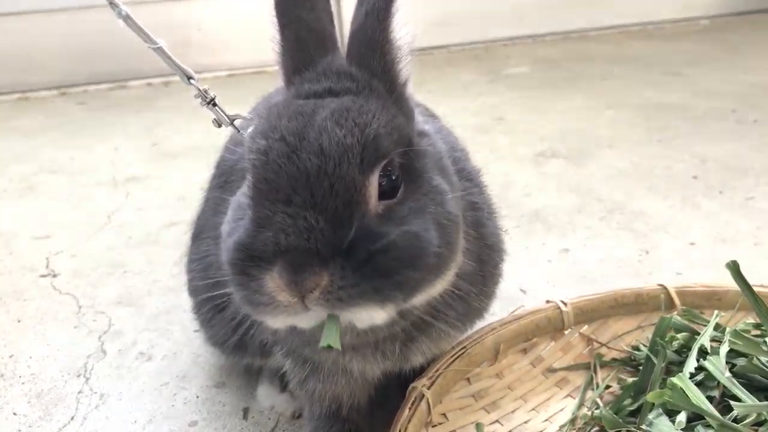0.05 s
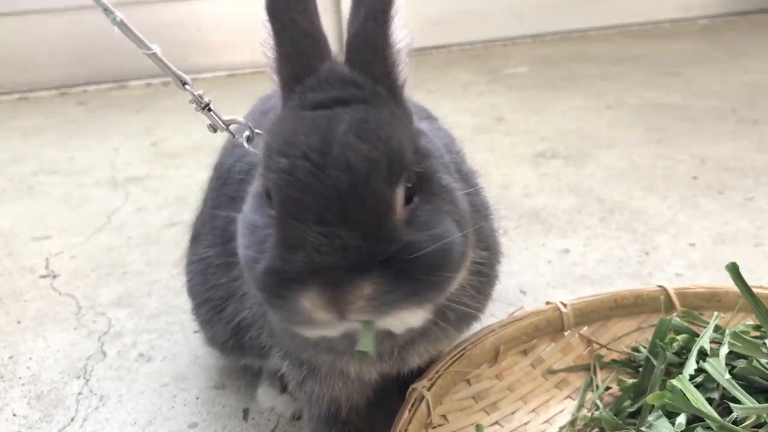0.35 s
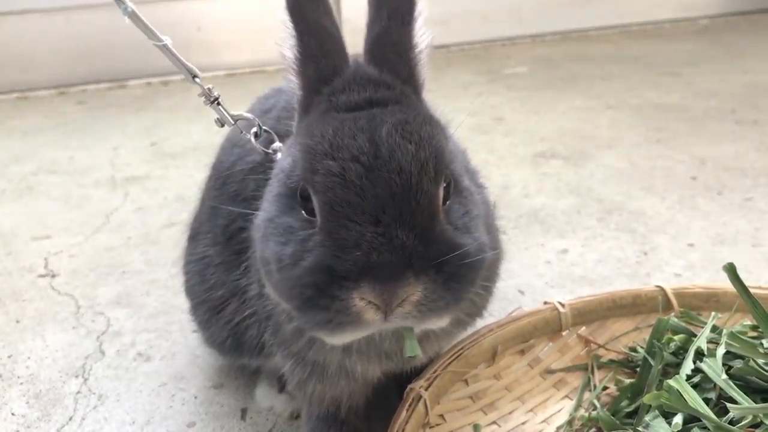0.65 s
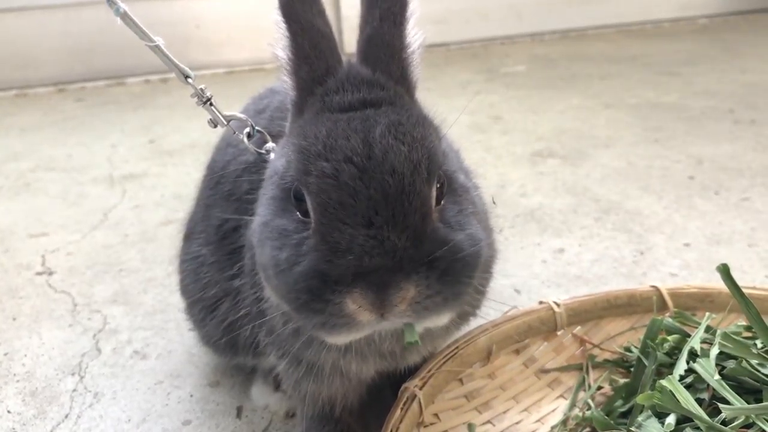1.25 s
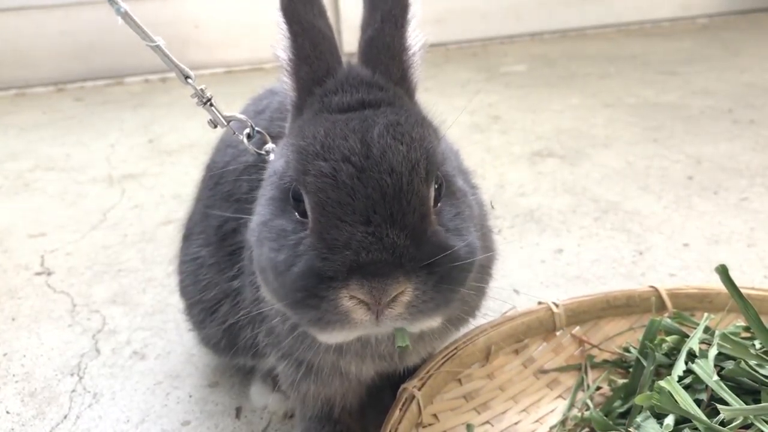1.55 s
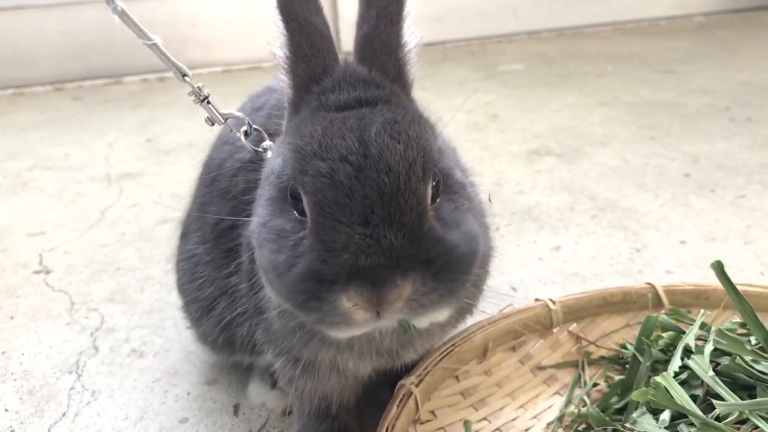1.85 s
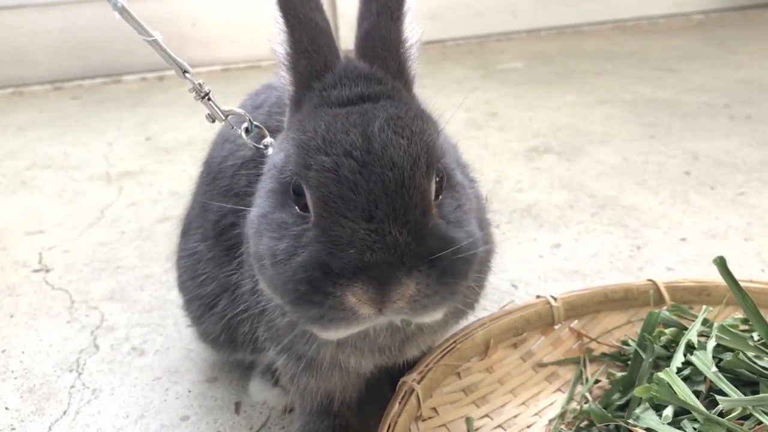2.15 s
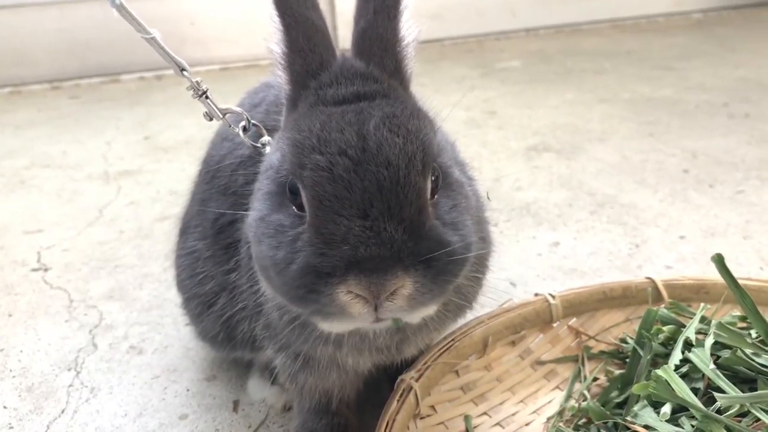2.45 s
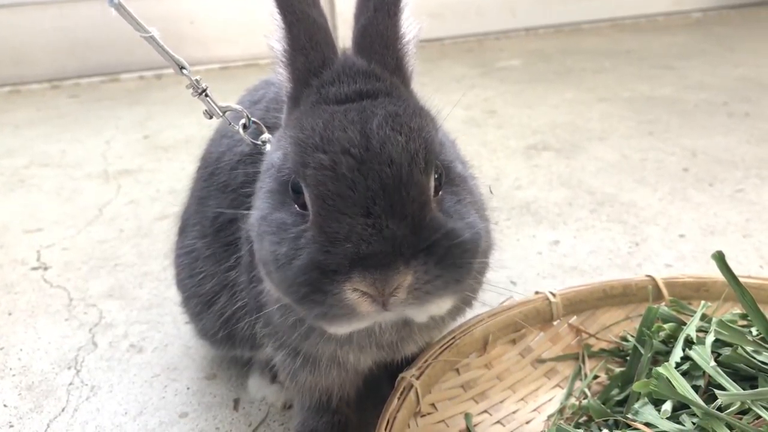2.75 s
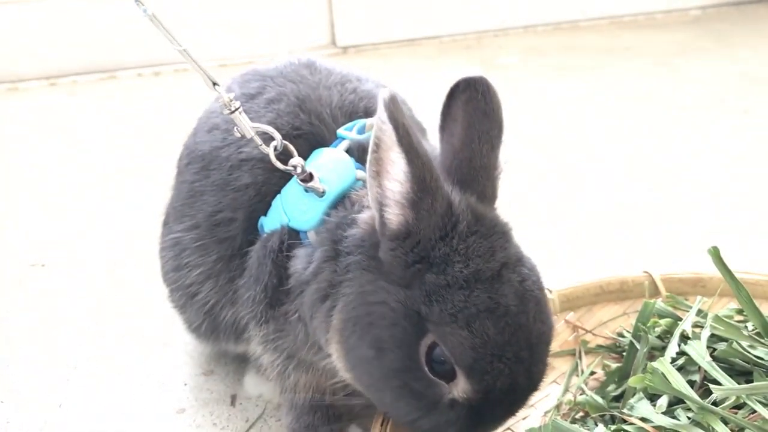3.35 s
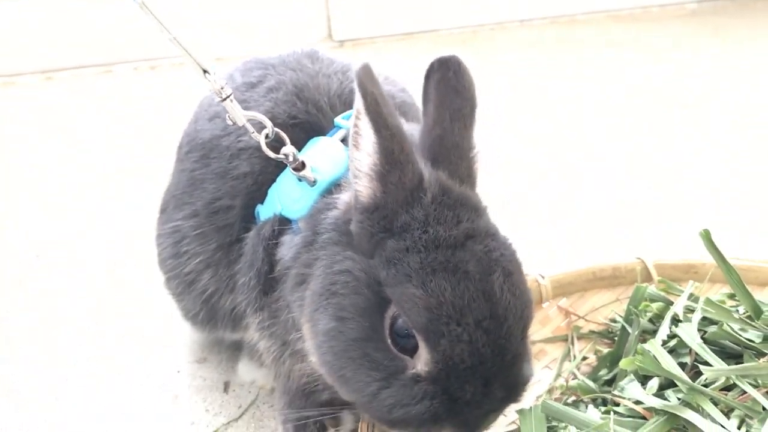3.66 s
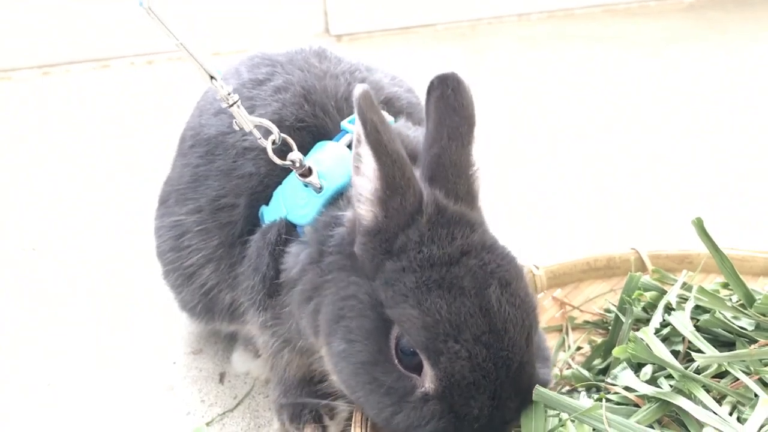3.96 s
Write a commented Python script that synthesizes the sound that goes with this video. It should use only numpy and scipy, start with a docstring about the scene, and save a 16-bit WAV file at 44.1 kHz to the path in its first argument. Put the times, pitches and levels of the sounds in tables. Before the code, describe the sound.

Close, regular crunching of a rabbit eating hay, then light leaf rustling.

```python
"""A rabbit chews hay close by, in a quiet room with a low machine hum and faint hiss.
From the start fibres grind and snap, and the teeth meet four to five times a second; the hard floor
echoes every click at once. From 0.5 s the mouth pops softly between knocks; at 2.5 s, a tiny squeak.
From 2.7 s the head dips into a basket: leaves rustle and the floor echo comes sooner."""
import sys
import numpy as np
from scipy import signal
from scipy.fft import rfft, irfft
from scipy.io import wavfile
from scipy.ndimage import map_coordinates

SR = 44100
rng = np.random.default_rng(int(sys.argv[2]) if len(sys.argv) > 2 else 0)


def log_audio(samples):
    """Write samples as a 16-bit WAV file to the path given in sys.argv[1]."""
    # one column per channel
    frames = np.atleast_2d(samples).T
    # limit to full scale, then quantise
    limited = np.clip(frames, -1, 1)
    pcm = np.round(limited * 32767).astype(np.int16)
    wavfile.write(sys.argv[1], SR, pcm)


N = 176400


def amp(db):
    """Decibels to gain."""
    return 10 ** (np.asarray(db) / 20)


def unit(x):
    """Scale to rms 1."""
    return x / np.sqrt(np.mean(x ** 2) + 1e-20)


def spectrum_db(colour, hz):
    """Interpolate (frequency [Hz], level [dB]) points on a log-frequency axis."""
    points_hz, db = np.transpose(colour)
    return np.interp(np.log(hz + 1), np.log(points_hz + 1), db)


def add(mix, start_s, sound):
    """Mix a sound in at start_s."""
    part = mix[max(0, round(start_s * SR)):][:len(sound)]
    part += sound[:len(part)]


def shaped_noise(gain):
    """Noise with the given gain per frequency bin, rms 1."""
    return unit(irfft(rfft(rng.standard_normal(N)) * gain, N))


def drift(hz):
    """Slow random wander, rms 1."""
    return shaped_noise(np.exp(-(np.fft.rfftfreq(N, 1 / SR) / hz) ** 2))


def click(*colours, size=1024):
    """Minimum-phase impulse with the sum of the given dB spectra."""
    hz = abs(np.fft.fftfreq(size, 1 / SR))
    log_gain = np.log(amp(sum(spectrum_db(colour, hz) for colour in colours)))
    spectrum = np.exp(np.conj(signal.hilbert(log_gain)))
    return np.fft.ifft(spectrum).real[:size // 2]


def crumble(sound, share, decay_s):
    """Spread a share of a click's energy into a dying spray of tiny fractures, thin in the bass."""
    t = np.arange(SR // 50) / SR
    spray = rng.standard_normal(len(t)) * np.exp(-t / decay_s)
    spray[0] = 0
    spray = signal.sosfilt(signal.butter(2, 1500, "highpass", fs=SR, output="sos"), spray)
    spray *= np.sqrt(share) / np.linalg.norm(spray)
    spray[0] = np.sqrt(1 - share)  # direct click
    return signal.fftconvolve(sound, spray)


def crackle(colour, per_s, spread_db):
    """Random tiny fractures of uneven size, rms 1; each stalk thickness stresses its own band."""
    stalks_hz, lift_db, relative_width = np.geomspace(1500, 13500, 10), 14, 0.2
    sizes = amp(spread_db * np.minimum(rng.exponential(1, N), 3)) * rng.choice([-1, 1], N)
    fractures = sizes * (rng.random(N) < per_s / SR)
    kind = rng.integers(0, len(stalks_hz), N)
    hz = np.fft.rfftfreq(1024, 1 / SR)
    out = np.zeros(N)
    for k, stalk_hz in enumerate(stalks_hz):
        band_db = lift_db / (1 + ((hz / stalk_hz - 1) / relative_width) ** 2)
        grain = click(colour, np.column_stack([hz, band_db]))
        out += signal.oaconvolve(fractures * (kind == k), grain)[:N]
    return unit(out)


def hum():
    """Low, nearly pure machine hum, slowly sagging in pitch, with two weak wavering lines."""
    # main line: (time [s], level [dB])
    envelope = [(0.0, -50.5), (0.81, -50.5), (1.1, -47.5), (2.03, -49), (2.17, -50), (2.71, -49.5),
                (3.39, -55.5), (4.0, -54)]
    # weak lines: (frequency [Hz], level re main line [dB])
    lines = [(176.5, -28.5), (205.4, -36)]
    start_hz, sag_hz_per_s = 103.7, 0.45
    def tone(hz, db):
        return np.sqrt(2) * amp(db) * np.sin(2 * np.pi * np.cumsum(hz) / SR)
    t = np.arange(N) / SR
    level_db = np.interp(t, *np.transpose(envelope))
    out = tone(start_hz - sag_hz_per_s * t + 0.13 * drift(hz=6.2), level_db + 0.25 * drift(hz=8.3))
    for hz, db in lines:
        out += tone(hz + 1.4 * drift(hz=4.4), level_db + db + 2 * drift(hz=4.7))
    return out


def room_tone():
    """Steady room noise with a thin high hiss and three soft low thuds."""
    # room noise: (frequency [Hz], relative density [dB])
    air_colour = [(22, -20), (42, 7.5), (62, 2), (90, 6), (140, -3.5), (250, -7), (500, -13.5),
                  (1000, -17.5), (2000, -23), (3300, -23.5), (4800, -25), (5400, -21), (6000, -26),
                  (7500, -28), (10000, -30.5), (12200, -23.5), (13400, -21.5), (15000, -19), (15800, -21.5),
                  (16000, -98)]
    # thuds: (centre [s], half-width [s], level [dB])
    thuds = [(1.21, 0.03, -57), (3.694, .08, -63), (3.89, 0.081, -65)]
    # thud spectrum: (frequency [Hz], relative density [dB])
    thud_colour = [(22, -21), (40, 7), (60, -4), (100, -4), (200, -69), (800, -65)]
    air_db, hiss_db, hiss_hz, half_width_hz = -66, -76, 13880, 300
    hz, t = np.fft.rfftfreq(N, 1 / SR), np.arange(N) / SR
    hiss = amp(hiss_db) * shaped_noise(1 / (1 + ((hz - hiss_hz) / half_width_hz) ** 2))
    air = amp(air_db) * shaped_noise(amp(spectrum_db(air_colour, hz)))
    thud_gain = sum(amp(db) * np.exp(-((t - at_s) / half_s) ** 2) for at_s, half_s, db in thuds)
    return air + hiss + thud_gain * shaped_noise(amp(spectrum_db(thud_colour, hz)))


def grinding():
    """Hay crackles faintly throughout and swells under each stroke of the jaw."""
    # jaw strokes: (centre [s], length [s], level before lift_db [dB])
    strokes = [(0.078, 0.12, -79), (0.392, 0.041, -79), (0.478, 0.019, -76), (0.565, 0.037, -75),
               (0.705, 0.033, -75), (1.061, 0.012, -70), (1.122, 0.075, -78.5), (1.267, 0.029, -75.5),
               (1.335, 0.022, -80.5), (1.546, 0.091, -81), (1.68, 0.013, -75), (1.751, 0.056, -79),
               (1.908, 0.02, -72.5), (1.986, 0.013, -76), (2.134, 0.014, -75.5), (2.201, 0.019, -79.5),
               (2.335, 0.029, -80.5), (2.434, 0.015, -78.5), (2.623, 0.068, -82), (2.712, 0.016, -71),
               (2.868, 0.03, -77.5), (2.933, 0.009, -77), (3.001, 0.0078, -71.5), (3.064, 0.013, -76.5),
               (3.276, 0.031, -78), (3.343, 0.015, -74.5), (3.675, 0.051, -77), (3.882, 0.044, -75.5),
               (3.972, 0.049, -80)]
    # hay fracture spectrum: (frequency [Hz], gain [dB])
    hay_colour = [(200, -28), (900, -1.5), (3000, -2), (4600, -8.5), (7000, -5.5), (9000, -4.5),
                  (11000, -0.5), (13200, 3), (16000, -21)]
    idle_db, lift_db = -79.5, 11
    t = np.arange(N) / SR
    power = np.full(N, amp(idle_db) ** 2)
    for at_s, length_s, db in strokes:
        power += amp(db + lift_db) ** 2 * np.exp(-(2 * (t - at_s) / length_s) ** 2)
    return np.sqrt(power) * crackle(hay_colour, per_s=1400, spread_db=9)


def snaps():
    """Single brittle fibres break with short bright ticks."""
    # breaks: (time [s], gain [dB], extra at 10 kHz [dB], extra up to 6.5 kHz [dB])
    breaks = [(0.0557, -25.0, 6.5, -9.5), (0.0631, -35.0, 1.0, 1.5), (0.0954, -21.0, -4.5, -18.0),
              (0.1833, -33.0, 5.0, -1.5), (0.4509, -30.0, 1.5, -9.0), (0.4791, -31.0, -2.5, -9.5),
              (0.4898, -25.5, -4.5, -24.5), (0.6291, -22.0, 10.0, -6.0), (0.666, -19.0, -1.5, -24.0),
              (0.7062, -27.5, -5.5, -12.0), (0.9055, -19.5, 0.5, -14.5), (0.9197, -18.5, -6.5, -12.0),
              (0.9991, -23.5, -6.5, -27.0), (1.0401, -34.0, 11.0, -6.0), (1.0686, -25.5, -3.5, -13.5),
              (1.1227, -28.5, 1.0, -16.5), (1.1362, -24.0, -3.5, -5.0), (1.3109, -18.0, -10.0, -18.5),
              (1.3564, -29.5, -11.5, -10.5), (1.3987, -29.0, 0.5, -11.5), (1.6029, -26.0, 3.5, 3.0),
              (1.7138, -30.0, -8.0, -3.0), (1.7469, -28.0, -8.0, -14.0), (1.9531, -16.0, -9.0, -17.0),
              (2.0184, -31.0, 5.0, -6.5), (2.1716, -28.5, 0.5, -22.5), (2.3472, -30.5, 5.5, -2.5),
              (2.3896, -26.0, -14.0, -7.0), (2.4413, -22.5, 0.0, -20.0), (2.4719, -28.5, -7.0, -22.0),
              (2.6519, -26.0, 9.5, -5.0), (2.812, -30.0, -11.0, -33.0), (3.0284, -31.5, 1.5, -5.0),
              (3.1925, -36.0, 10.0, -6.0), (3.2874, -37.0, 10.0, 5.5), (3.3157, -28.5, 11.0, -3.0),
              (3.4553, -24.5, 11.0, -4.0), (3.4879, -38.0, 11.0, 0.5), (3.5111, -26.5, 11.0, -1.5),
              (3.5196, -22.0, 11.0, -9.0), (3.5755, -33.5, 9.5, -0.5), (3.6915, -27.5, 3.0, -9.0),
              (3.6982, -30.5, 7.5, -10.5), (3.7131, -17.0, 9.0, -6.0), (3.8428, -23.5, 9.0, -19.0)]
    # tick spectrum: (frequency [Hz], gain [dB])
    fibre_colour = [(200, -24), (1500, -9), (3000, -5.5), (4200, -11), (6500, -5.5), (10000, -9.5),
                    (13300, -1.5), (16500, -5)]
    out = np.zeros(N)
    for at_s, db, mid_db, low_db in breaks:
        tick = click(fibre_colour, [(6500, low_db), (9200, mid_db), (11000, mid_db), (13300, 0)])
        add(out, at_s, amp(db) * crumble(tick, share=0.25, decay_s=0.0008))
    return out


def teeth():
    """Teeth knock once a chew, sometimes twice, coloured by the mouth's resonance."""
    # knocks: (time [s], gain [dB], extra at 2 kHz [dB], at 3.4 kHz [dB], at 6.5 kHz [dB], mouth [Hz])
    knocks = [(0.095, -27, 6, -6.0, -3.5, 604), (0.451, -23.5, -1.5, -13, -10, 850.0),
              (0.5689, -34, 1.5, 9, -4, 1440.0), (0.6639, -24, -2, -1.5, -5.5, 397),
              (0.6694, -26.5, 2, -5, -8.5, 380.0), (0.8611, -34, 0, 0, 0, 790.0),
              (1.0635, -41.5, 4, 13, 9, 2400.0), (1.068, -37, 4, 12, 7, 740.0),
              (1.0933, -32.0, 8, -5.5, 0, 1120.0), (1.0979, -27.0, -1, -9.0, -15, 1200.0),
              (1.1917, -25.5, -11.0, -8.0, -8.5, 440.0), (1.3114, -27.5, 3.5, -6, 0.5, 520.0),
              (1.521, -27, -2, 0, -3.5, 1070), (1.7305, -36, 4.5, -3, -11, 970.0),
              (1.736, -33.0, 0, -5, -5.5, 1080.0), (1.7431, -29, 6.0, -2, -2, 1170),
              (1.9529, -28.5, -2, -2, 3.5, 1050.0), (1.9575, -30, 3, -4, -3, 1050),
              (2.171, -20, -3, -9, -4.5, 1080), (2.3931, -26, 2, 1, -3, 1080),
              (2.4148, -36.0, 3, -3, 3, 940.0), (2.6109, -33, 5.5, 3, -4, 1020.0),
              (2.8265, -35, 4.5, -3.5, -1, 1300.0), (2.8334, -29.0, -3, -8, -1.5, 1300.0),
              (3.0379, -28, 0.5, 5.0, -1, 1070.0), (3.2512, -23, -1, -0.5, -6, 640.0),
              (3.2537, -28.5, -3, 6, -18, 676), (3.4707, -21, 0.5, 10.5, -5.5, 1370),
              (3.6776, -32, 5, 6, 0.0, 1170), (3.88, -31, 4, 8.5, -1, 750.0)]
    # knock spectrum: (frequency [Hz], gain [dB])
    tooth_colour = [(80, -42), (230, 1), (400, 4.5), (620, 5), (1100, 2), (1800, 0.5), (3000, -1),
                    (4800, -4), (6500, -2), (9000, -7), (16000, -8.5)]
    mouth_db, half_width_octaves = 7, 0.25
    hz = np.geomspace(100, 8000, 120)
    out = np.zeros(N)
    for at_s, db, body_db, mid_db, high_db, mouth_hz in knocks:
        resonance_db = mouth_db / (1 + (np.log2(hz / mouth_hz) / half_width_octaves) ** 2)
        tilt = [(1100, 0), (1700, body_db), (2400, body_db), (3400, mid_db), (6500, high_db)]
        knock = click(tooth_colour, np.column_stack([hz, resonance_db]), tilt)
        add(out, at_s, amp(db) * crumble(knock, share=0.3, decay_s=0.0018))
    return out


def mouth_pops():
    """The opening mouth pops wetly in a band around 3 kHz."""
    # pops: (time [s], relative level [dB])
    pops = [(0.4707, -37), (1.424, -38), (1.6031, -28), (1.8596, -37), (2.2893, -37.5), (2.5097, -30),
            (2.721, -30.5), (2.727, -32), (2.938, -29.5), (3.002, -31.5), (3.3743, -31.5), (3.5196, -32),
            (3.5855, -36), (3.789, -36.5), (3.957, -35)]
    # pop spectrum: (frequency [Hz], gain [dB])
    pop_colour = [(200, 0), (1300, -9), (2000, 2), (2700, 3.5), (3500, 2), (4400, -18), (8000, -17),
                  (16000, -18)]
    out = np.zeros(N)
    for at_s, db in pops:
        add(out, at_s, amp(db + 1) * crumble(click(pop_colour), share=0.57, decay_s=0.0017))
    return out


def jaw_bump(at_s=0.6655, level_db=-43.5):
    """The jaw bumps once, dully, in two damped modes."""
    # jaw modes: (frequency [Hz], relative level [dB], T60 [s])
    modes = [(300, 0, .026), (930, -12, .015)]
    t = np.arange(SR // 10) / SR
    out = np.zeros(N)
    for hz, db, t60_s in modes:
        add(out, at_s, amp(level_db + db - 60 * t / t60_s) * np.sin(2 * np.pi * hz * t))
    return out


def squeak(at_s=2.515, length_s=0.045, peak_hz=4400, peak_db=-77):
    """Tiny squeak between two chews; pitch and level rise and fall together."""
    arch = np.sin(np.pi * np.arange(0, length_s, 1 / SR) / length_s)
    hz = peak_hz * (1 + 0.054 * (arch - 1))
    out = np.zeros(N)
    add(out, at_s, amp(peak_db) * arch * np.sin(2 * np.pi * np.cumsum(hz) / SR))
    return out


def rustle():
    """Leaves crinkle unevenly against the head as it dips into the basket."""
    # brushing: (time [s], level [dB])
    envelope = [(2.7, -85), (2.88, -74), (3.1, -76), (3.3, -73), (3.42, -78), (3.515, -71), (3.58, -78),
                (3.71, -77), (4, -78)]
    # leaf fracture spectrum: (frequency [Hz], gain [dB])
    leaf_colour = [(300, -16), (1100, -3), (2000, -5), (3250, 6), (4900, -12), (5900, -3), (7800, -5),
                   (9700, -1), (12500, -5), (15500, -5)]
    level_db = np.interp(np.arange(N) / SR, *np.transpose(envelope)) + 2.5 * drift(hz=30)
    return amp(level_db) * crackle(leaf_colour, per_s=1400, spread_db=8)


def floor_and_room(direct):
    """The hard floor reflects the treble at once; a faint room tail follows."""
    # floor echo, sooner as the head dips: (time [s], delay [s])
    delays = [(0, 0.0005), (2.95, 0.00041), (3.3, 0.000208), (4, 0.00021)]
    echo_gain, echo_above_hz = 0.7, 5100
    tail_db, t60_s, rise_s = -13.5, 0.073, 0.0056
    t = np.arange(N) / SR
    delay_s = np.interp(t, *np.transpose(delays))
    treble = signal.sosfiltfilt(signal.butter(2, echo_above_hz, "highpass", fs=SR, output="sos"), direct)
    echo = map_coordinates(treble, [np.arange(N) - SR * delay_s], order=3)
    near = (direct + echo_gain * echo) / np.hypot(1, echo_gain)
    age_s = t[:SR // 2]
    tail = rng.standard_normal(len(age_s)) * amp(-60 * age_s / t60_s) * np.minimum(age_s / rise_s, 1)
    return near + amp(tail_db) * signal.oaconvolve(near, tail / np.linalg.norm(tail))[:N]


def scene():
    """The chewing rabbit in the humming room, mono."""
    rabbit = teeth() + jaw_bump() + snaps() + mouth_pops() + grinding() + rustle() + squeak()
    return (floor_and_room(rabbit) + hum() + room_tone())[None]


def record(dry):
    """Low cut and band limit."""
    low_hz, high_hz = 33, 16600
    dry = signal.sosfilt(signal.butter(4, low_hz, "highpass", fs=SR, output="sos"), dry)
    lowpass = signal.firwin(401, high_hz, window=("kaiser", 9), fs=SR)
    return signal.oaconvolve(dry, lowpass[None], "same")


dry = scene()
out = record(dry)
log_audio(out)
```